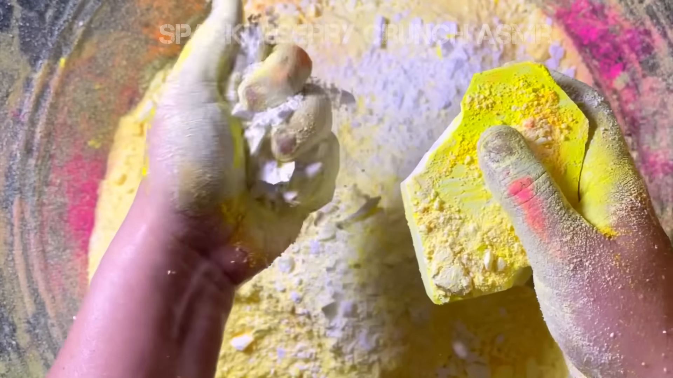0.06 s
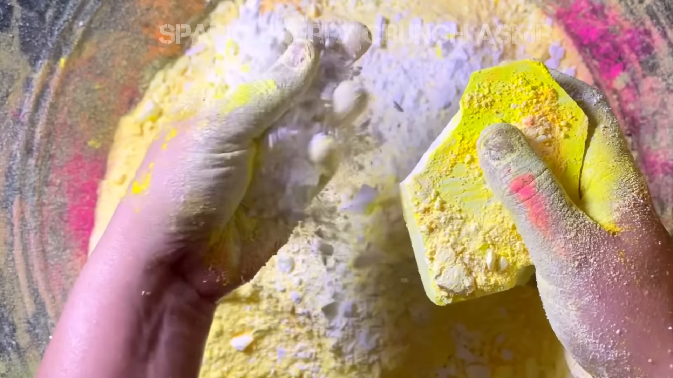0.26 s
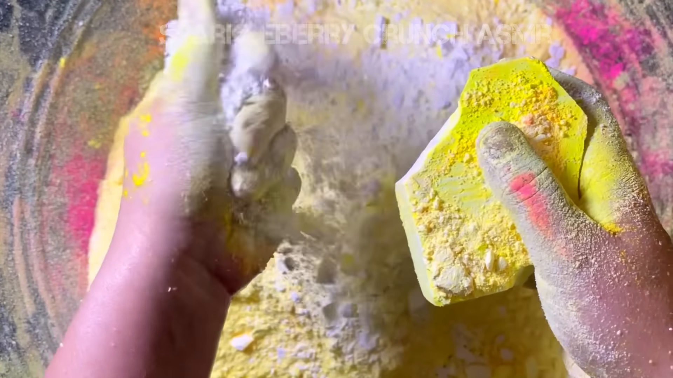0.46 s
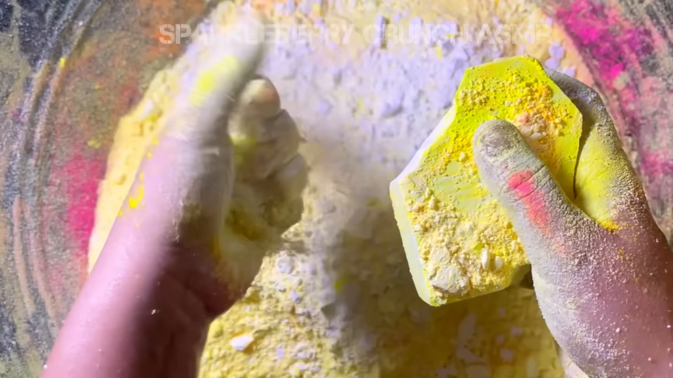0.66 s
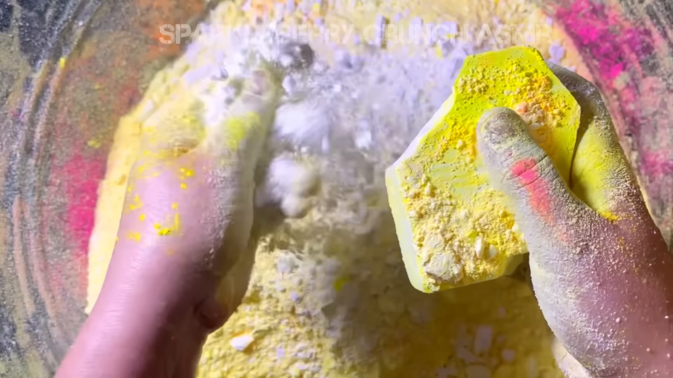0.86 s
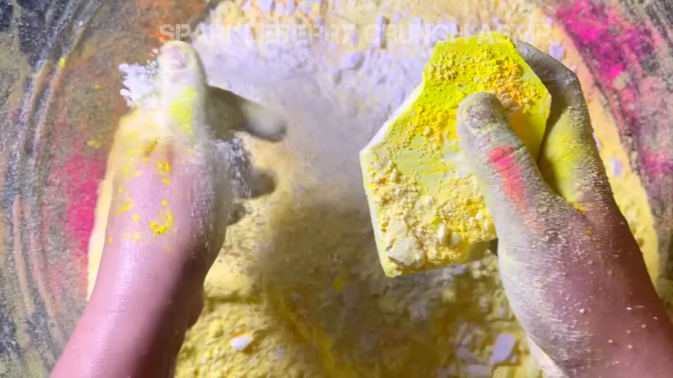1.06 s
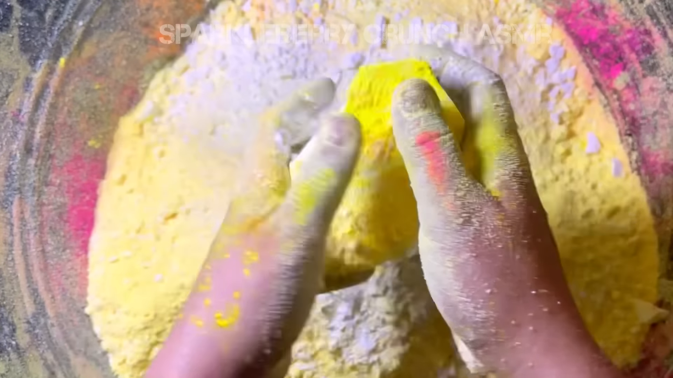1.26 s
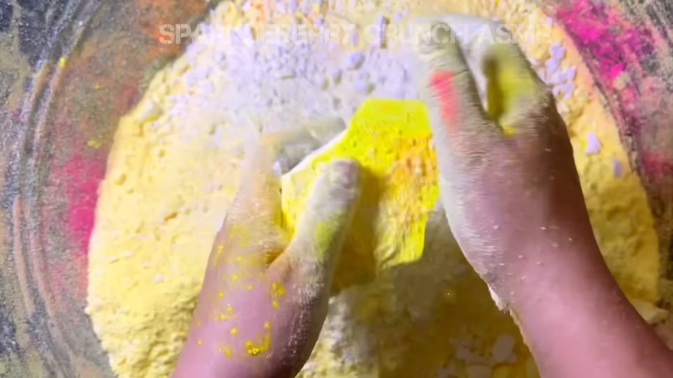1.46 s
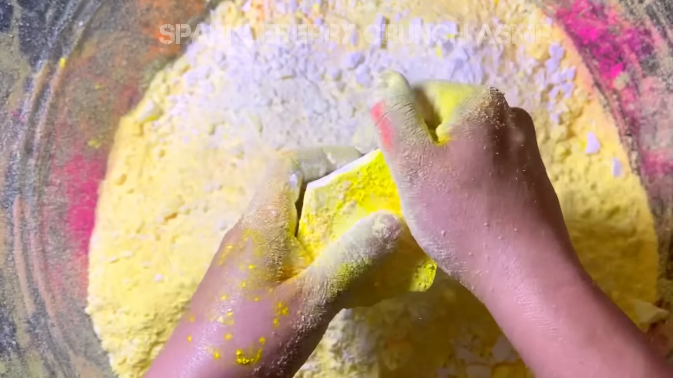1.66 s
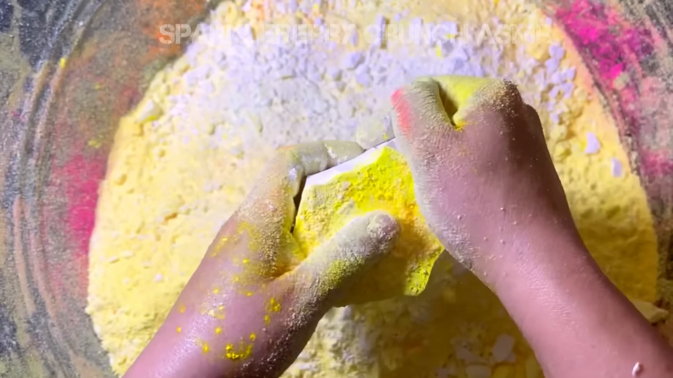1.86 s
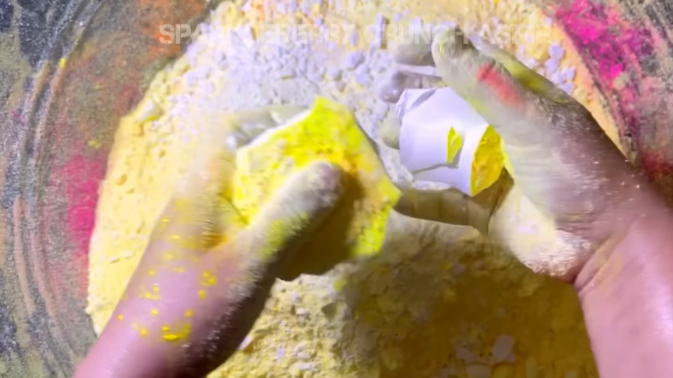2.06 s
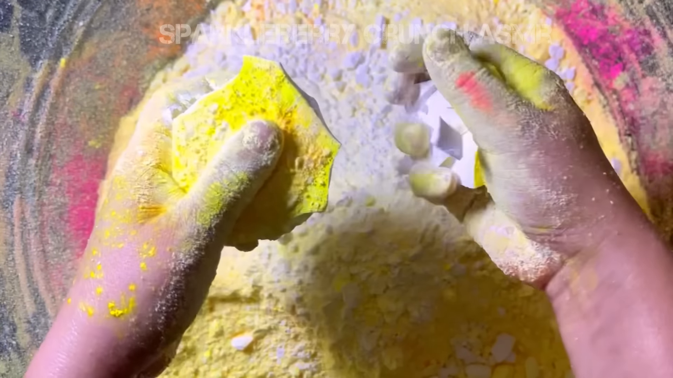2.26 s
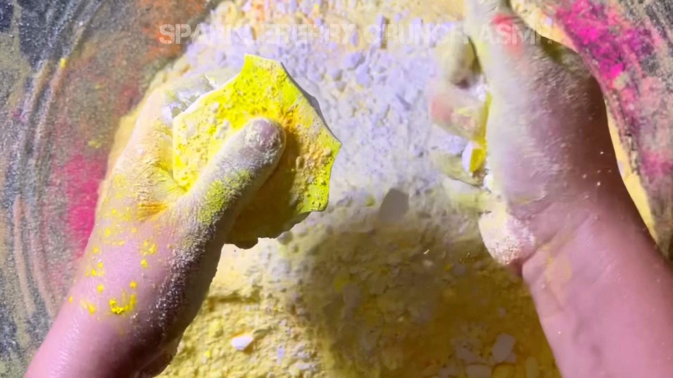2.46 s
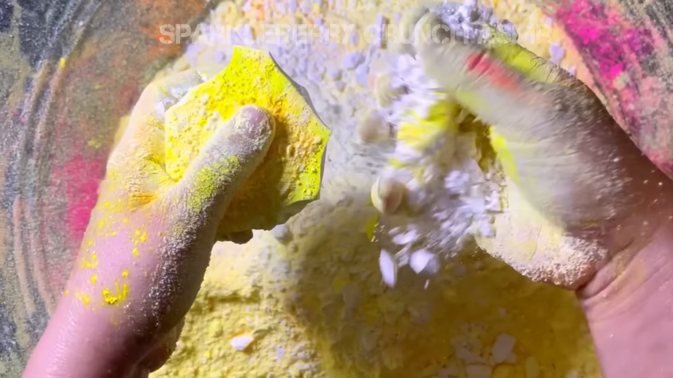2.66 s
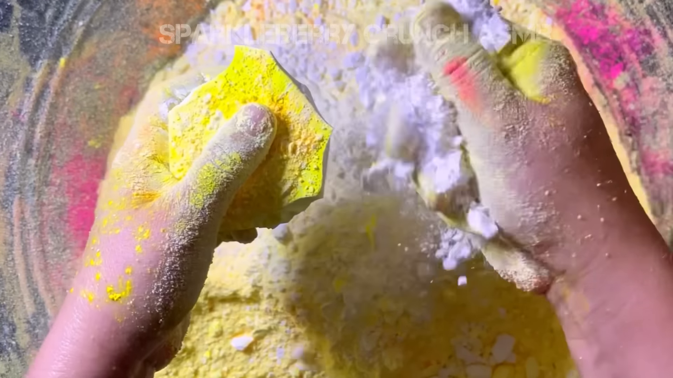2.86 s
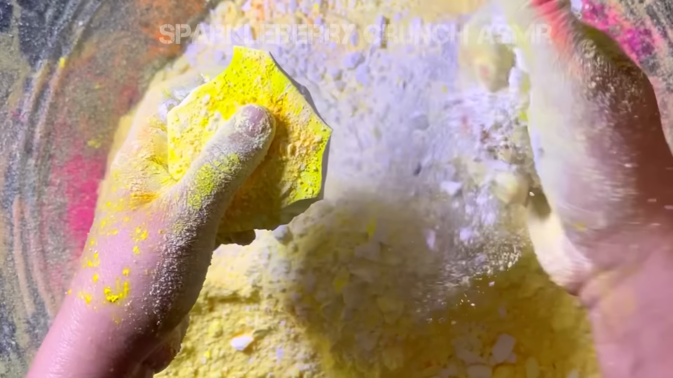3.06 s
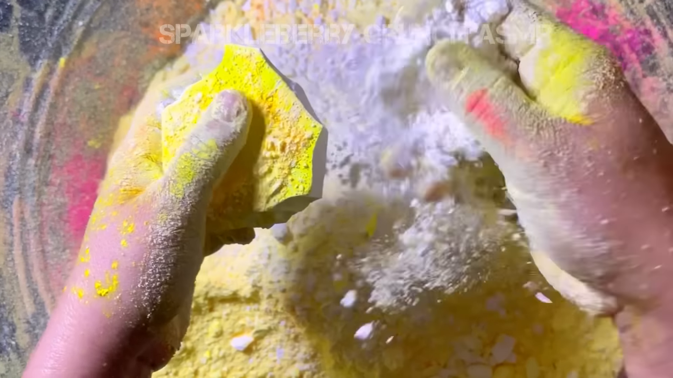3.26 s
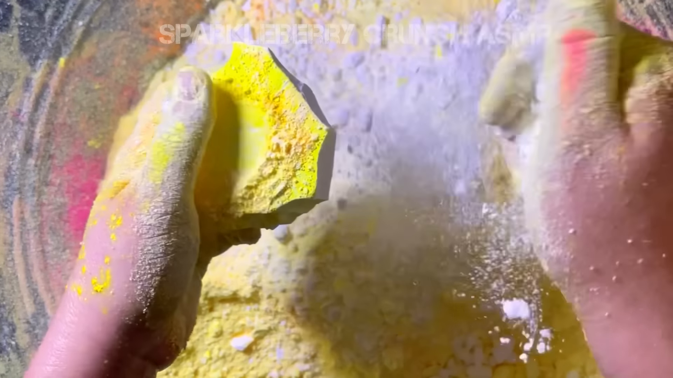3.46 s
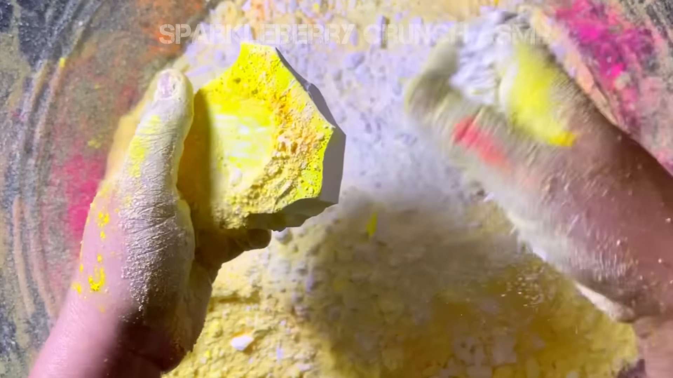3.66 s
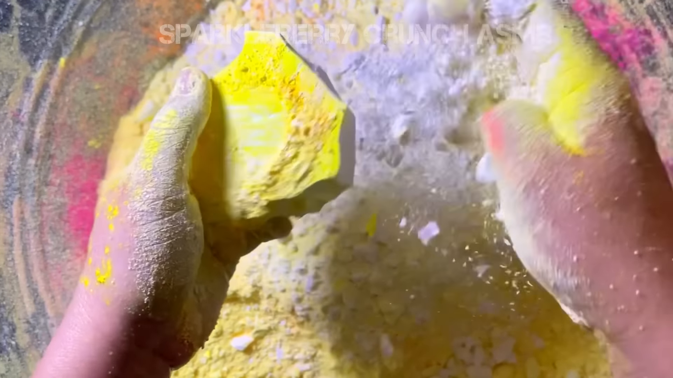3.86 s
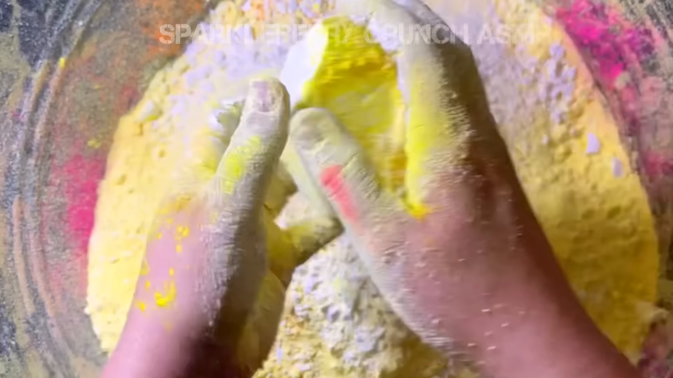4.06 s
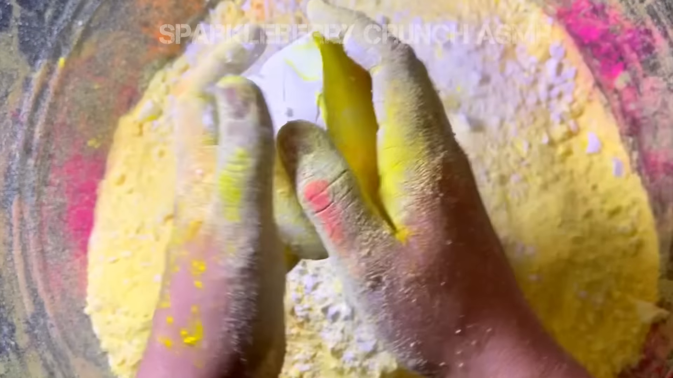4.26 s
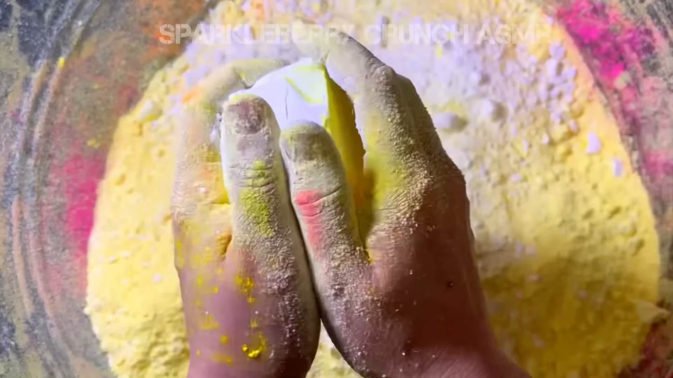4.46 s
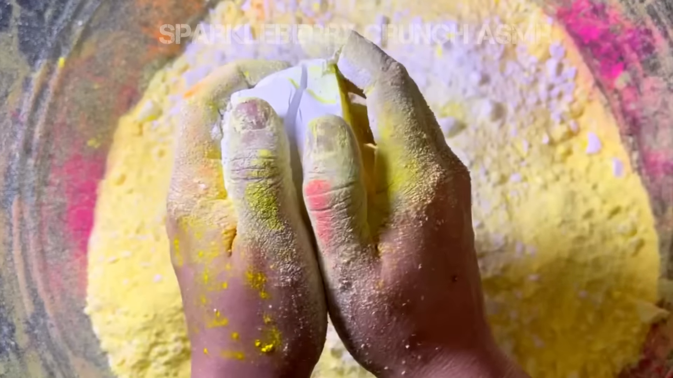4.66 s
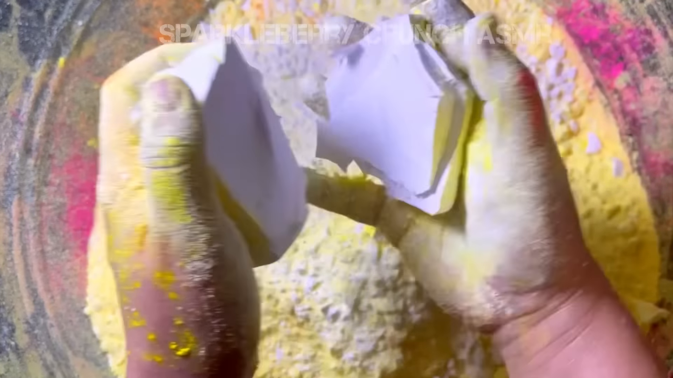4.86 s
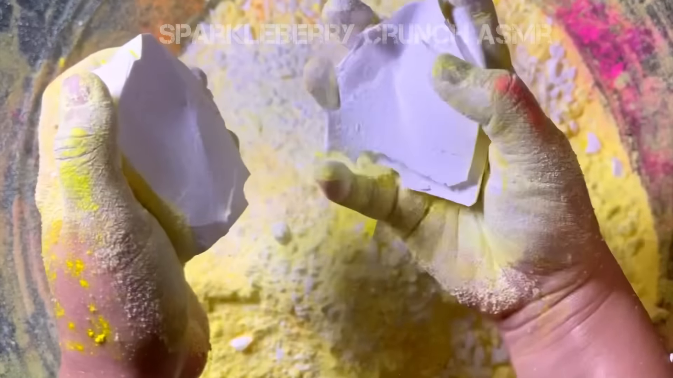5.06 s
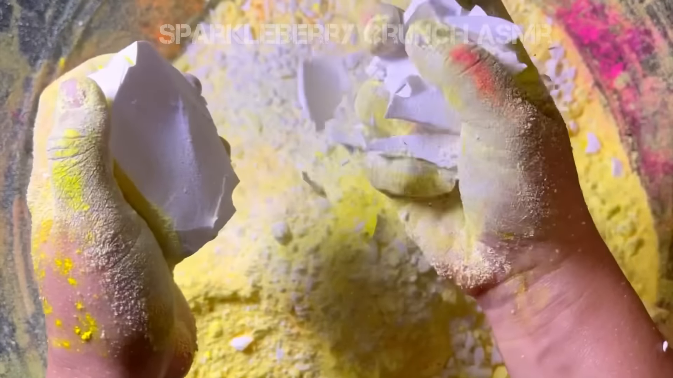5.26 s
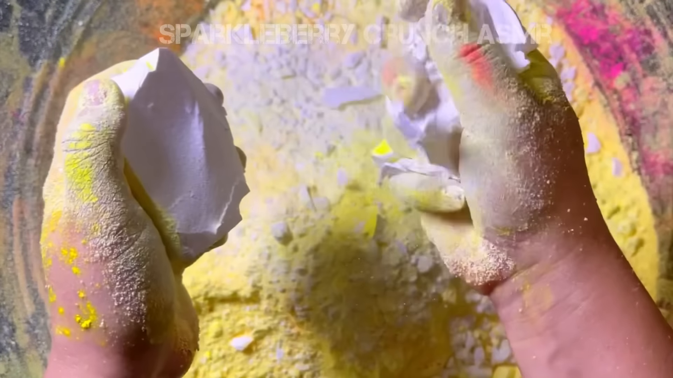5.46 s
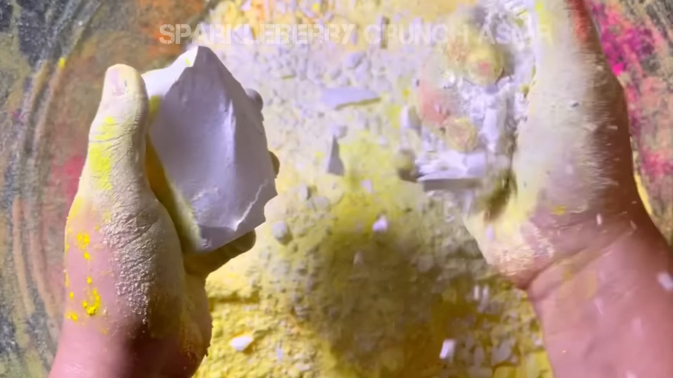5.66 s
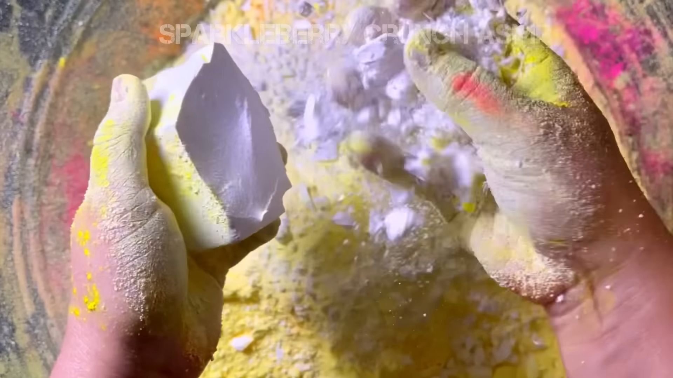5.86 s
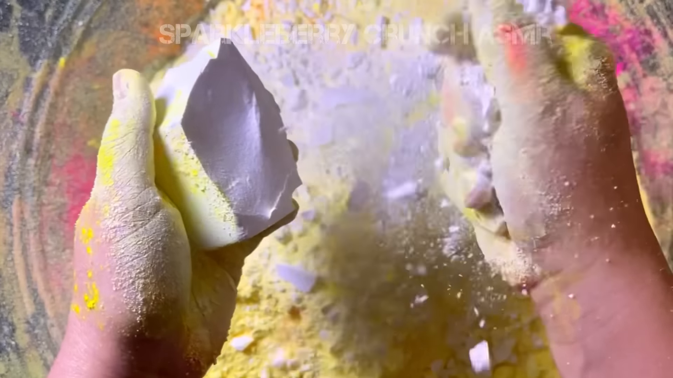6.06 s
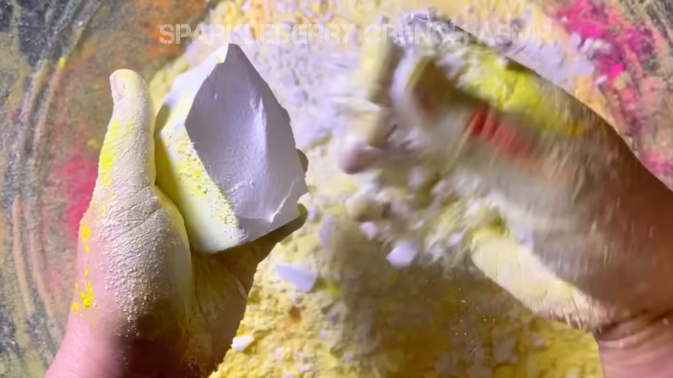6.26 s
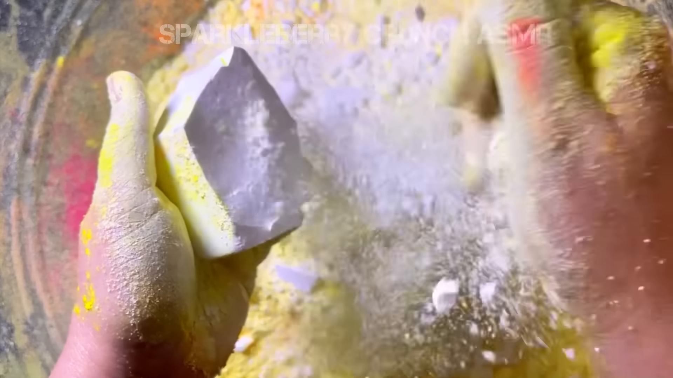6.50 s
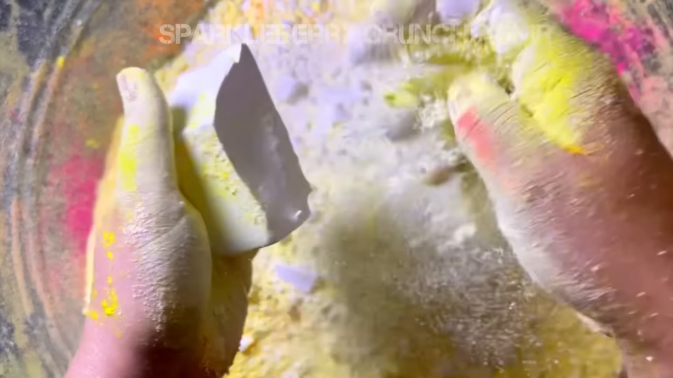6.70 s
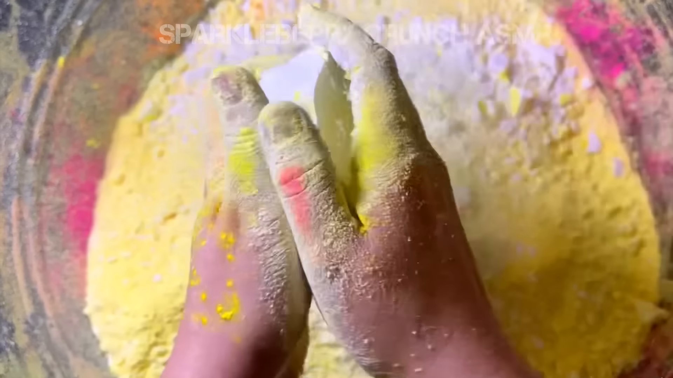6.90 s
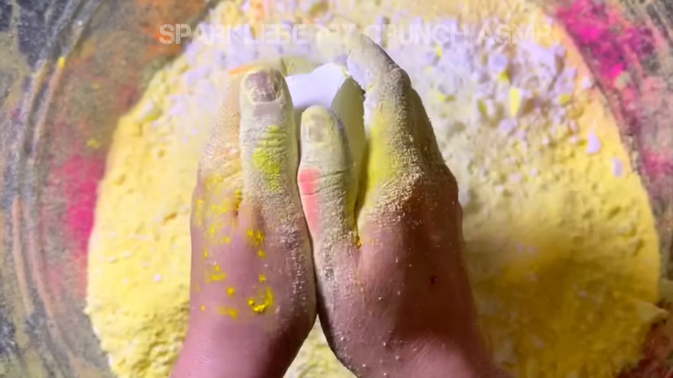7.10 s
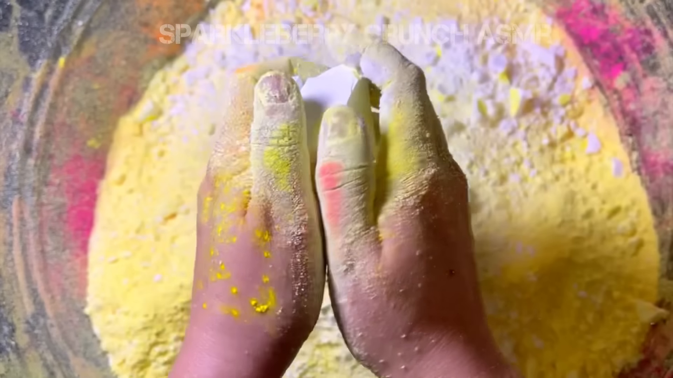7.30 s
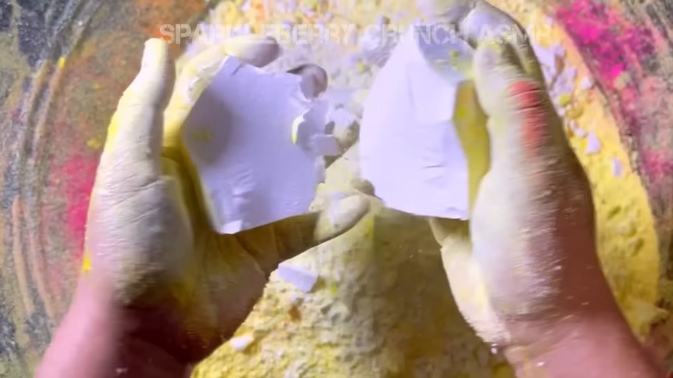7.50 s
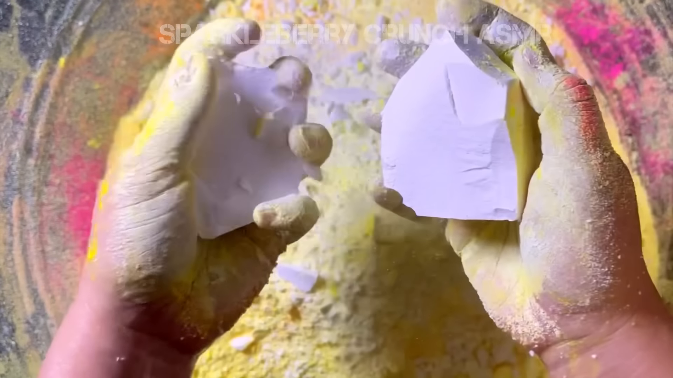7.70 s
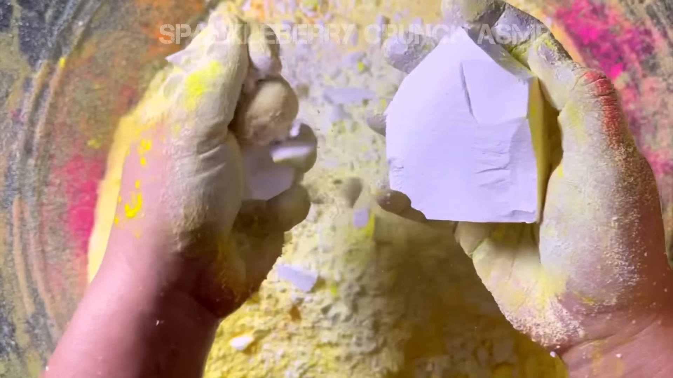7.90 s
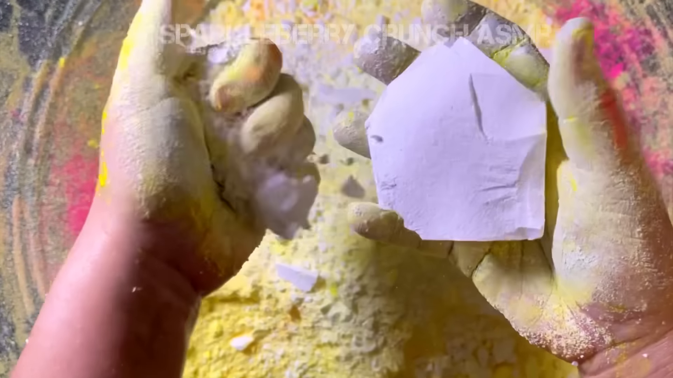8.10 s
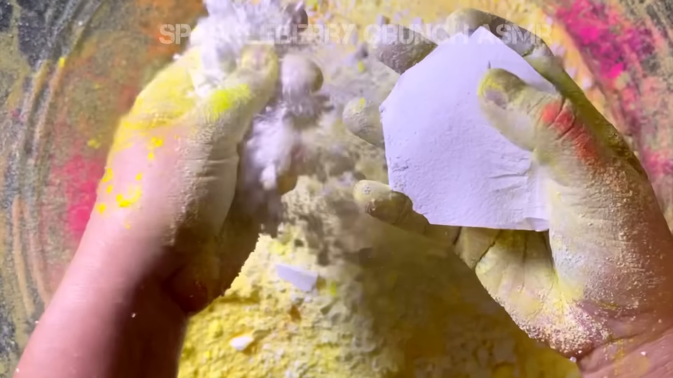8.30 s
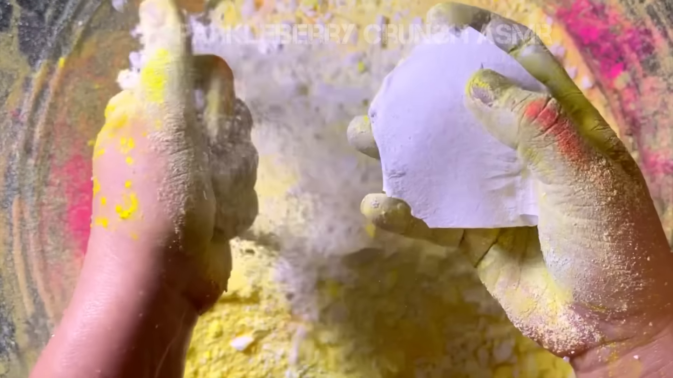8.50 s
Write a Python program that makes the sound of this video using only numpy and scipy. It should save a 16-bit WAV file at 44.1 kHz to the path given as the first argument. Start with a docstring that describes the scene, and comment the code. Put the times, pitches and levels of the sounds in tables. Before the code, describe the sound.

Very close, dry crunching of pressed chalk: bright cracks, ticking chips, sandy grinding in the fists, brief powdery rubs and two dull claps.

```python
"""Blocks of pressed chalk crack in two hands over a heap of powder, close up in a small room.
Each crack is a noise burst through resonances; single chips tick, and kneaded grit is clustered random grains.
Soft crumbs patter below, lumps knock, air puffs, faces rub in a fluttering hiss and clap together twice.
A short room tail, a wavering hum and low rumble lie behind; the loudest peaks clip."""
import sys
import numpy as np
from scipy import signal
from scipy.fft import rfft, irfft
from scipy.io import wavfile
from scipy.ndimage import map_coordinates

SR = 44100
rng = np.random.default_rng(int(sys.argv[2]) if len(sys.argv) > 2 else 0)


def pcm_store(signal):
    """Save signal as 16-bit PCM."""
    levels = np.round(np.clip(np.atleast_2d(signal), -1, 1) * 32767)
    wavfile.write(sys.argv[1], SR, levels.astype(np.int16).T)


N = 376613
TIME = np.arange(N) / SR
SHORT = TIME[:SR // 2]  # half a second, for single blows

# low modes of the small room, set off by cracks and claps: (f/Hz, relative level/dB, t60/s)
ROOM_MODES = [(83, 3, 0.059), (151, 1.5, 0.23), (184, 0, 0.13), (230, -8.5, 0.14), (296.7, 1, 0.13)]
# spectrum of crushed grit: (f/Hz, relative level/dB)
GRIT_SPECTRUM = [(100, -34), (500, -7), (1100, -3), (2200, 1.5), (4500, -2.5), (7700, -1), (11000, -4),
                 (15800, -10)]
# spectrum of powdered faces sliding: (f/Hz, relative level/dB)
SLIDE_SPECTRUM = [(150, -6), (1200, -17.5), (2000, -13.5), (3900, -7.5), (4700, -8.5), (6200, -8.5),
                  (11500, -5), (15800, -9)]


def amp(db):
    """Decibels to gain."""
    return 10 ** (np.asarray(db) / 20)


def unit(x):
    """Scaled to rms 1."""
    return x / np.sqrt(np.mean(x ** 2) + 1e-20)


def along(points, hz):
    """(Hz, value) points read on a log frequency axis."""
    f, v = np.transpose(points)
    return np.interp(np.log(hz + 1), np.log(f + 1), v)


def level(rows):
    """Gain over time from (s, dB) rows."""
    return amp(np.interp(TIME, *np.transpose(rows)))


def wobble(rate):
    """A smooth random curve, rate knots a second."""
    return map_coordinates(rng.standard_normal(4096), [TIME * rate], mode="wrap")


def add(track, s, sound):
    """Mix a sound into the track at time s."""
    start = max(0, round(s * SR))
    track[start:start + len(sound)] += sound[:max(0, N - start)]


def colour(x, spectrum, size=8192):
    """Minimum-phase filter with the given spectrum, so clicks keep their sharp front."""
    gain = amp(along(spectrum, np.fft.rfftfreq(size, 1 / SR)))
    cepstrum = irfft(np.log(gain + 1e-6))
    cepstrum[1:size // 2] *= 2  # folding the cepstrum forward makes the filter causal
    cepstrum[size // 2 + 1:] = 0
    impulse = irfft(np.exp(rfft(cepstrum)))
    return signal.fftconvolve(x, impulse)[:len(x)]


def resonate(x, hz, q):
    """One resonance with unit gain at its centre, which is held 2 kHz below the Nyquist limit."""
    w = 2 * np.pi * min(hz, SR / 2 - 2000) / SR
    a = np.sin(w) / (2 * q)
    return signal.lfilter([a, 0, -a], [1 + a, -2 * np.cos(w), 1 - a], x)


def ring(modes):
    """Damped sines, at slightly new strengths for each blow."""
    out = 0
    for hz, db, t60 in modes:
        decay = amp(db + rng.normal(0, 2) - 60 * SHORT / t60)
        out = out + decay * np.sin(2 * np.pi * hz * SHORT)
    return out


def pops(chance, spread_db):
    """Random impulses, many small and a few large; chance is given per sample."""
    n = len(chance)
    size = amp(spread_db * np.minimum(rng.standard_exponential(n), 4))
    return (rng.random(n) < chance) * size * rng.choice([-1, 1], n)


def grains(rate, spread_db, low_hz, high_hz, q, clump_db, count=7):
    """Grains of several sizes break in brief clusters, each size with its own dull pitch."""
    chance = np.ones(N) * rate / count / SR
    out = np.zeros(N)
    for hz in np.geomspace(low_hz, high_hz, count):
        clustered = pops(chance, spread_db) * amp(clump_db * wobble(260))
        out += resonate(clustered, hz, q)
    return unit(out)


def reflect(x, delay, gain):
    """Sound plus its echo from the nearby palm, which carves a comb into the spectrum."""
    t = TIME[:len(x)]
    echo = np.interp(t - delay, t, x, left=0)
    return (x + gain * echo) / np.hypot(1, gain)


def cracks():
    """A crack runs as an avalanche of micro-fractures that ring the fragment, then sheds fine debris."""
    # the main fractures: (t/s, relative level/dB, time the crack runs/s, reference pitch f/Hz)
    fractures = [(0.1616, -15, 0.0015, 3600), (1.6785, -12.5, 0.0016, 7400), (1.7098, -15, .006, 6100),
                 (1.7277, -7.5, 0.0029, 2000), (1.758, -0.5, 0.0054, 5100), (2.1585, 1, 0.0067, 4270),
                 (2.17, -8, 0.0057, 3520), (2.2253, -5.5, 0.0049, 3040), (2.268, -6, .0012, 4600),
                 (2.3125, -6.5, 0.0026, 2720), (2.3493, 0.5, 0.0022, 3380), (2.361, -4.5, 0.001, 3100),
                 (2.817, -11, 0.0012, 3030), (3.3838, -8, 0.00046, 2020), (3.417, -7, 0.0011, 2630),
                 (3.4328, -10.5, 0.0042, 3500), (3.761, -13.5, 0.0015, 5690), (4.508, -13, 0.0036, 5040),
                 (5.033, -10.5, 0.00088, 6100), (5.0699, 0.5, 0.012, 5160), (5.0959, 3, 0.012, 4340),
                 (5.114, -9, 0.0049, 3300), (5.1293, 4, 0.0087, 3840), (5.1607, -4, 0.0028, 2850),
                 (5.173, -10, 0.0048, 3320), (5.1914, -6, 0.005, 3830), (5.2678, -2, 0.00053, 3060),
                 (5.305, -4, 0.0011, 4100), (5.3748, -3, 0.0032, 2600), (5.385, -4, 0.0047, 4600),
                 (5.4331, -2.5, 0.0011, 2380), (5.4616, -3, 0.0018, 5100), (5.4858, -7.5, 0.0069, 4870),
                 (5.5127, -8.5, 0.0032, 3400), (5.6808, -16, 0.0032, 4000), (7.6827, 1.5, 0.004, 3476),
                 (7.7051, 9, 0.0029, 4500), (7.7217, -5, 0.0049, 3995), (7.7344, 0, 0.0098, 3830),
                 (7.749, -5, 0.0043, 3900), (7.7695, -2.5, 0.0047, 3550), (7.7784, -6, 0.0013, 2440),
                 (7.8173, -6, 0.0026, 2610)]
    out, t = np.zeros(N), SHORT[:SR // 12]
    knots = SHORT[::32]
    for s, db, run, hz in fractures:
        running = amp(-60 * np.maximum(t - run, 0) / 0.0025)
        jitter_db = 3 * np.interp(t, knots, rng.standard_normal(len(knots)))
        breaks = rng.standard_normal(len(t)) * running * amp(jitter_db)
        breaks[0] += 2.5  # extra edge on the first break

        snap = resonate(breaks, hz * 0.71, q=0.58)
        snap += amp(-16.5) * resonate(breaks, 10300, q=0.69)
        snap += amp(-3.0) * resonate(breaks, hz * 0.09, q=0.34)
        snap += amp(3.5) * resonate(breaks, hz * rng.uniform(0.453, 1), q=14)  # the fragment's own dead note
        snap /= np.sqrt(np.sum(snap ** 2) / (run * SR + 16))  # about unit level while the crack runs

        specks = pops(np.full(len(t), .12), spread_db=5)
        debris = unit(resonate(specks, hz, q=0.3))
        size = run / (run + 0.0051)  # long cracks shed more and set off the low modes more
        burst = snap + amp(-9.5 - 60 * t / 0.046) * size * debris
        echo_s = rng.uniform(0.507, 2) / 1000
        add(out, s, amp(db - 1.0) * reflect(burst, echo_s, gain=0.39))
        add(out, s, amp(db / 2 - 23.5) * size * ring(ROOM_MODES))
    return out


def chip(hz):
    """One corner snapping off, peak 1: a sharp tick, a brief clink and a little of the block's body."""
    t = SHORT[:SR // 40]
    snap = rng.standard_normal(len(t)) * amp(-60 * t / 0.0021)
    snap[0] += 1
    tick = resonate(snap, hz, q=0.9)
    clink = amp(4.5) * resonate(snap, hz, q=15)
    body = amp(-12.5) * resonate(snap, hz / 3, q=0.7)
    sound = tick + clink + body
    return sound / abs(sound).max()


def splinters(force):
    """Corners chip off in single ticks: a few loud ones, and many small ones as the grip tightens."""
    # the loudest single corners chipping off: (t/s, peak level/dB, f/Hz)
    loud_chips = [(0.297, -10.5, 5980), (0.426, -1.5, 2900), (0.865, -6.5, 4660), (0.876, -12, 1800),
                  (1.021, -10.5, 1870), (2.213, -1, 2600), (2.251, 3, 4250), (2.276, 4, 3050),
                  (2.384, 3, 5350), (2.435, -3, 3580), (2.828, -4.5, 3000), (3.451, -1, 3000),
                  (3.871, -12, 1920), (3.902, -6.5, 3100), (4.568, -9, 2130), (4.594, -5, 3880),
                  (5.252, 3.5, 2996), (5.298, 6, 3920), (5.344, 2, 5600), (5.501, 5, 4540),
                  (5.522, 6.5, 4450), (5.995, -5.5, 2352), (6.146, -8, 1910), (6.504, -5, 6640),
                  (7.802, 2, 3230), (7.931, -0.5, 6120)]
    light_per_s, full_grip_per_s = 24, 110  # small chips always there, and added under a full grip
    out = np.zeros(N)
    for s, db, hz in loud_chips:
        add(out, s + .001, amp(db) * chip(hz))
    grip = np.minimum(force / amp(-22), 1)
    chance = (light_per_s + full_grip_per_s * grip ** 4) / SR
    for i in np.flatnonzero(rng.random(N) < chance):
        hz = 3600 * 2 ** np.clip(rng.normal(0, 0.64), -2, 1)
        peak = amp(rng.uniform(-10, -1)) * (force[i] / amp(-21)) ** 1.25
        add(out, i / SR, peak * chip(hz))
    return out


def stroke(s, length, attack_s, sag, release):
    """One hand movement: pressure builds, sags as the chalk gives way, then is let go (slopes in dB/s)."""
    t = TIME - s
    build = np.clip(t / attack_s, 0, 1)
    drop_db = sag * np.clip(t, 0, length) + release * np.maximum(t - length, 0)
    return build * amp(-drop_db)


def hands():
    """Strength over time of grinding, spilling and sliding; overlapping movements add in power."""
    # a block collapses in the fist: (t/s, length/s, level/dB)
    crushes = [(2.15, 0.19, -16), (5.065, 0.071, -13.5), (5.264, 0.046, -22), (5.375, .145, -22.5),
               (7.676, 0.111, -15), (7.885, 0.062, -26.5)]
    # fingers knead the pieces: (t/s, length/s, level/dB, falling crumbs relative to the grit/dB)
    squeezes = [(-.05, 0.034, -29, -10.5), (0.187, 0.31, -31, -3), (0.653, 0.041, -38.5, 2.5),
                (0.706, 0.036, -29, -11), (0.812, 0.19, -37, -3.5), (1.697, 0.035, -34, -7),
                (2.045, 0.11, -34, -6), (2.645, 0.34, -30, -4), (3.034, 0.031, -34.5, -0.5),
                (3.199, 0.32, -33, -6), (3.724, 0.079, -32.5, -12), (3.87, 0.082, -40, 2.5),
                (4.981, 0.058, -33.5, -2.5), (5.605, 0.036, -32.5, -3.5), (5.771, 0.31, -28.5, -4),
                (6.262, 0.25, -31.5, -7), (6.588, 0.14, -40, -2.5), (7.562, 0.044, -35.5, -9),
                (8.04, 0.037, -32, -8), (8.168, 0.34, -31, -3.5)]
    # a whole block slides on skin or another block: (t/s, length/s, level/dB, caught grit re hiss/dB)
    rubs = [(1.112, 0.18, -45, 4), (1.371, 0.062, -42, 2.5), (1.477, 0.096, -39, -5.5),
            (1.901, 0.051, -33.5, -8), (4.022, 0.061, -27, -19), (4.056, 0.33, -37.5, -16),
            (4.186, 0.048, -25, -23), (4.616, 0.17, -35.5, -25), (6.806, 0.042, -30, -6),
            (6.86, 0.059, -39, -3), (7.239, 0.22, -41.5, -17), (7.312, 0.056, -37, -12)]
    crush_crumbs_db = -20  # a closed fist lets little fall
    rub_crumbs_db = -4.5  # relative to the caught grit

    moves = []  # each a strength curve and its shares of grinding, spilling and sliding
    for s, length, db in crushes:
        grip = amp(db) * stroke(s, length, attack_s=0.018, sag=11, release=99.5)
        moves.append((grip, [1, amp(crush_crumbs_db), 0]))
    for s, length, db, crumbs_db in squeezes:
        grip = amp(db) * stroke(s, length, attack_s=0.048, sag=1.5, release=75)
        moves.append((grip, [1, amp(crumbs_db), 0]))
    for s, length, db, grit_db in rubs:
        grip = amp(db) * stroke(s, length, attack_s=0.051, sag=1, release=211)
        moves.append((grip, [amp(grit_db), amp(grit_db + rub_crumbs_db), 1]))
    grips, shares = zip(*moves)
    return np.sqrt(np.square(shares).T @ np.square(grips))


def kneading(force, spill):
    """Squeezing breaks grains and small clods; soft crumbs patter below and fine powder hisses."""
    # spectrum of falling crumbs: (f/Hz, relative level/dB)
    crumb_spectrum = [(40, -22), (90, -1), (200, -1), (300, 1.5), (430, -7.5), (900, -10.5), (3000, -21.5)]
    rate = 2000 * (force / amp(-30.5) + 1e-4) ** 0.36  # grains per second, more when squeezed harder
    coarse = grains(rate, spread_db=3.5, low_hz=664, high_hz=12200, q=1.76, clump_db=6.5)
    coarse = unit(colour(coarse, GRIT_SPECTRUM))
    powder = unit(colour(pops(np.full(N, .5), spread_db=1.0), GRIT_SPECTRUM))
    clods = grains(170, spread_db=3.0, low_hz=700, high_hz=4530, q=5.7, clump_db=1.5)

    clumps = amp(2.46 * wobble(60))
    packed = np.hypot(1, force / amp(-24))  # tightly packed grit slips less
    grit = force / packed * (coarse + amp(-2.5) * powder + amp(-7) * clods) * clumps
    crumbs = grains(600, spread_db=4.5, low_hz=129, high_hz=1246, q=2.37, clump_db=1.0)
    crumbs = unit(colour(crumbs, crumb_spectrum))
    echo_s = 0.001117 + 0.000211 * wobble(9)
    return reflect(grit, echo_s, gain=0.35) + spill * crumbs


def rubbing(slide):
    """Powdered faces scrape with a fine hiss; the gap's resonances flutter as the hand shifts."""
    gap_hz = 1700  # spacing of the resonances in the gap between hand and block
    hiss = unit(colour(rng.standard_normal(N), SLIDE_SPECTRUM))
    bands = np.zeros(N)
    for k in range(3, 8):
        band = resonate(rng.standard_normal(N), k * gap_hz, q=4 * k)
        bands += band * amp(5.7 * wobble(18)) / k
    # a wavering read position makes them glide as the gap changes
    bands = map_coordinates(unit(bands), [(TIME + .009 * wobble(5)) * SR], mode="wrap")
    catches = grains(900, spread_db=2, low_hz=1510, high_hz=12050, q=16.0, clump_db=4)
    catches = unit(colour(catches, SLIDE_SPECTRUM))
    rub = amp(-3) * hiss + amp(-4) * bands + amp(-6) * catches
    return slide * rub * amp(2.3 * wobble(50) + 2.4 * wobble(450))


def knocks():
    """A soft lump gives a dead knock of a few cycles and a short crunch; small hard ones crunch more."""
    # lumps knocking in the palm or landing in the heap: (t/s, relative level/dB, f/Hz)
    lumps = [(0.241, -18.5, 300), (0.275, -19.5, 650), (0.4, -24, 300), (0.435, -22, 326),
             (1.278, -25, 314), (1.726, -9, 615), (2.121, -19, 580), (2.498, -21, 304), (2.849, -20, 940),
             (3.416, -14, 935), (3.486, -14.5, 760), (3.97, -14.5, 345), (4.005, -20.5, 397),
             (4.027, -16.5, 1300), (5.782, -15, 840), (5.797, -17, 480), (5.976, -18.5, 300),
             (6.073, -16, 261), (6.1, -19, 326), (6.293, -18.5, 880), (6.304, -24, 890),
             (6.861, -20.5, 285), (6.98, -15, 566), (7.39, -23.5, 1490), (7.6295, -12, 513),
             (8.076, -14, 273), (8.187, -14.5, 303)]
    out, t = np.zeros(N), SHORT[:SR // 10]
    for s, db, hz in lumps:
        thud = np.sin(2 * np.pi * hz * t) * amp(-60 * t * hz / 11)  # down 60 dB after 11 cycles
        crunch = unit(resonate(rng.standard_normal(len(t)), hz * 1.34, q=0.52)) * amp(-60 * t / 0.024)
        crust = unit(colour(rng.standard_normal(len(t)), GRIT_SPECTRUM)) * amp(-60 * t / 0.025)
        crust *= np.sqrt(hz / 2400)
        add(out, s + .002, amp(db) * (amp(2.0) * thud + amp(-4.5) * crunch + crust))
    return out


def claps():
    """Powder squirts out as the faces close; one push of air, then the blocks clack dryly in the hands."""
    # block clapped on block: (t/s, relative level/dB, relative clack level/dB)
    contacts = [(4.517, -9.5, -14), (7.0868, -7.5, -8)]
    # a block's heavily damped modes: (f/Hz, relative level/dB, Q)
    block_modes = [(1890, -6.5, 5.6), (2490, -11, 4.7)]
    squirt_spectrum = [(200, 10), (1100, 7.6), (2200, 7.5), (5000, 5.7), (15000, 2.1)]  # (f/Hz, level/dB)
    out, t = np.zeros(N), SHORT
    lead = .02  # seconds of swelling noise before contact
    for s, db, clack_db in contacts:
        swell = np.where(t < lead, amp((t - lead) * 1600 - 8.5), 1)
        decay = amp(-60 * np.maximum(t - lead - .006, 0) / 0.02)
        contact = rng.standard_normal(len(t)) * swell * decay
        squirt = colour(contact, squirt_spectrum)
        clack = sum(amp(mode_db) * resonate(contact, hz, q) for hz, mode_db, q in block_modes)
        push = np.sin(2 * np.pi * 200 * t) * amp(-60 * t / 0.025)
        add(out, s - lead, amp(db) * squirt + amp(clack_db + 23.5) * clack)
        add(out, s, amp(-20.5) * ring(ROOM_MODES) + amp(db + 7.5) * push)
    return out


def puffs():
    """A closing gap pushes one swing of air at the microphone while the faces scuff."""
    # air pushed out between hand and block: (t/s, relative level/dB, f/Hz)
    pushes = [(1.2193, -10.5, 68.6), (1.264, -17.5, 78), (4.035, -13.5, 76), (4.089, -13.5, 54.7),
              (4.2508, -4, 73), (6.848, -11, 80.4)]
    out, t = np.zeros(N), SHORT[:SR // 5] - .1  # time around the middle of the swing
    for s, db, hz in pushes:
        phase = 2 * np.pi * hz * t
        swing = -np.sin(phase) * np.exp(-(phase / 2.37) ** 2)
        scuff = unit(colour(rng.standard_normal(len(t)), SLIDE_SPECTRUM))
        scuff *= np.exp(-abs(t + 0.013) / 0.0042)  # strongest 13 ms ahead of the middle
        add(out, s + t[0], amp(db) * (swing + amp(-11.5) * scuff))
    return out


def tinks():
    """Short pitched ticks and clear notes of the chalk, each one damped sine."""
    # short pitched ticks and clear notes of the chalk: (t/s, mean level/dB, f/Hz, t60/s)
    notes = [(3.761, -0.5, 4950, 0.011), (7.392, -29.5, 1976, 0.18), (7.392, -42, 1147, 0.36),
             (5.648, -20, 2500, 0.071)]
    out = np.zeros(N)
    for s, db, hz, t60 in notes:
        add(out, s, ring([(hz, db, t60)]))
    return out


def room(x):
    """A small room's noise tail, dying faster in the top treble and redrawn every 50 ms as the hands move."""
    # decay time of the room: (f/Hz, t60/s)
    decay_times = [(150, 0.24), (3000, 0.34), (14000, 0.06)]
    out = np.zeros(N)
    block = SR // 20
    for start in range(0, N, block):
        hz, t, z = signal.stft(rng.standard_normal(SR // 2), SR, nperseg=256)
        decay = amp(-60 * t / along(decay_times, hz)[:, None])
        tail = signal.istft(z * decay, SR, nperseg=256)[1]
        tail /= np.linalg.norm(tail)
        add(out, start / SR + .004, signal.fftconvolve(x[start:start + block], tail))
    return colour(out, [(700, -0.5), (3000, -3.0), (14000, 4.5)])


def background():
    """Low room rumble and faint hiss from shaped noise, and a hum of sines wavering in level and phase."""
    # a motor humming in the room: (f/Hz, level before the swell/dB)
    hum_tones = [(48.4, -41), (91.5, -43)]
    # slow swell of the hum: (t/s, gain/dB)
    swell = [(.5, -0.5), (2.1, 4.5), (3.2, -5.5)]
    air_spectrum = [(15, -18.5), (35, 1.5), (100, -6.5), (300, -19.0), (900, -26.0), (5000, -36.5)]
    hum = np.zeros(N)
    for hz, db in hum_tones:
        phase = 2 * np.pi * hz * TIME + .5 * wobble(9.4)
        hum += amp(db + 3 * wobble(1.87)) * np.sin(phase)
    air = unit(colour(rng.standard_normal(N), air_spectrum))
    return level(swell) * hum + amp(-39.0) * air


def scene():
    """All the handling, close up, with a little room behind it."""
    force, spill, slide = hands()
    close = cracks() + splinters(force) + kneading(force, spill)
    close += rubbing(slide) + knocks() + claps() + tinks()
    return (close + amp(-16.5) * room(close) + puffs() + background())[None]


def record(dry):
    """The recorder clips at full scale and keeps nothing above its band limit."""
    top_hz = 15900
    clipped = np.clip(dry, -1, 1)
    kept = np.fft.rfftfreq(N, 1 / SR) < top_hz
    return irfft(rfft(clipped) * kept, N)


dry = scene()
out = record(dry)
pcm_store(out)
```